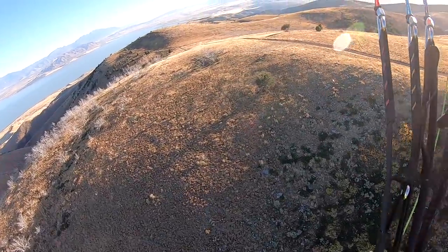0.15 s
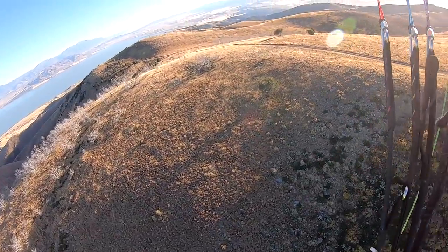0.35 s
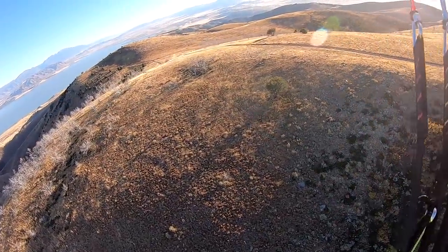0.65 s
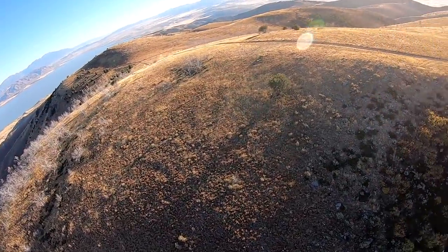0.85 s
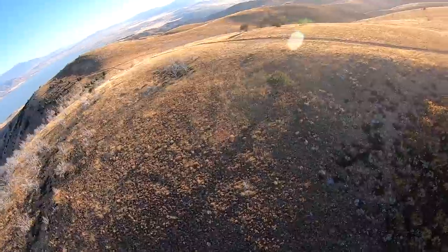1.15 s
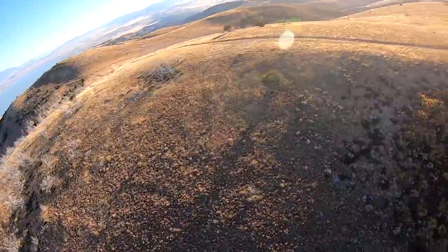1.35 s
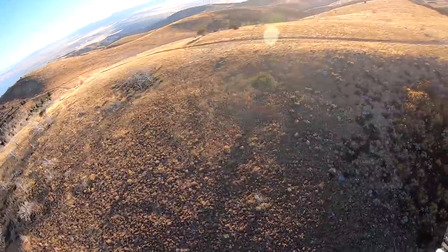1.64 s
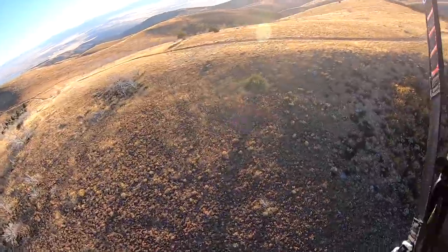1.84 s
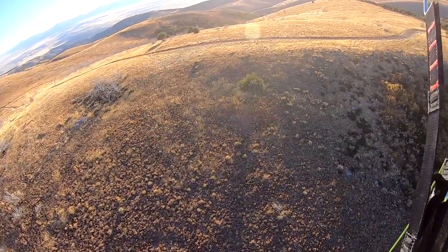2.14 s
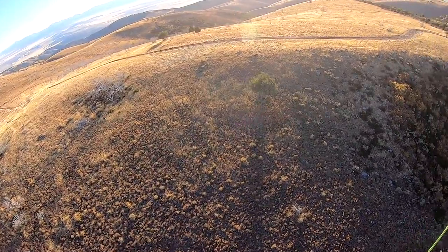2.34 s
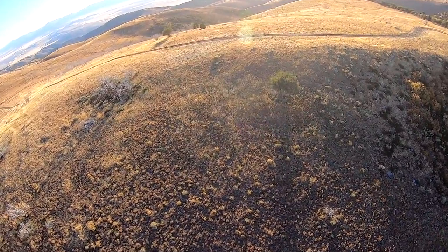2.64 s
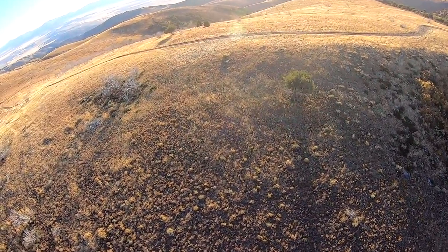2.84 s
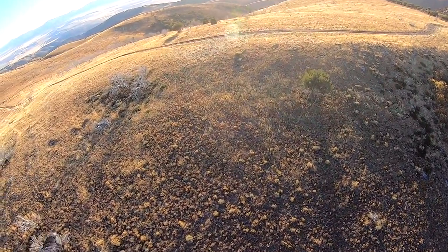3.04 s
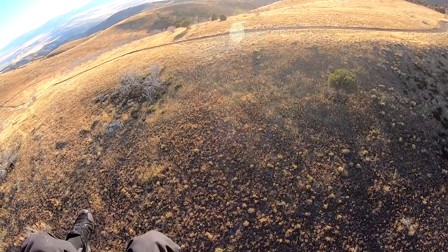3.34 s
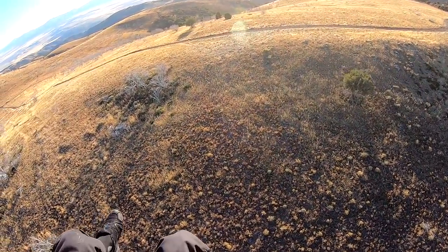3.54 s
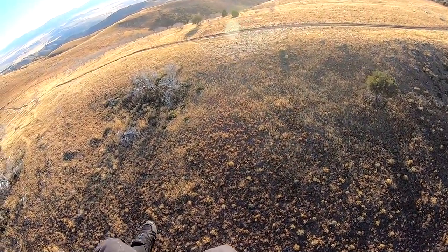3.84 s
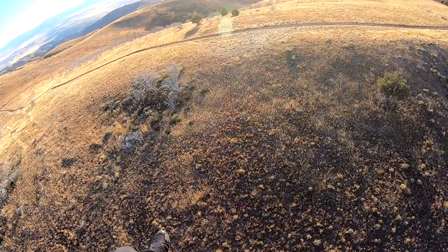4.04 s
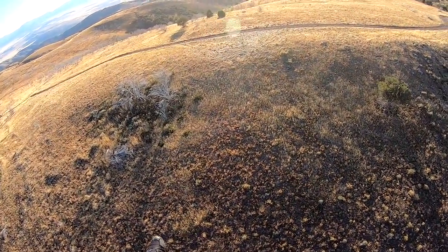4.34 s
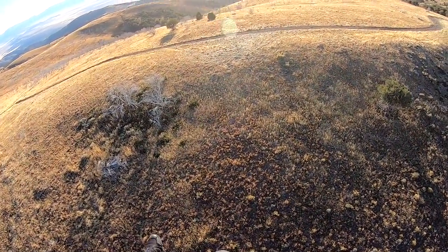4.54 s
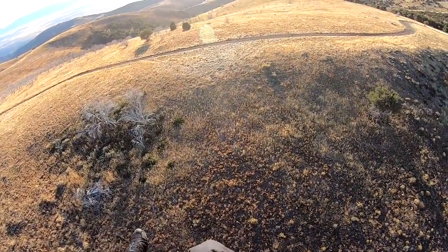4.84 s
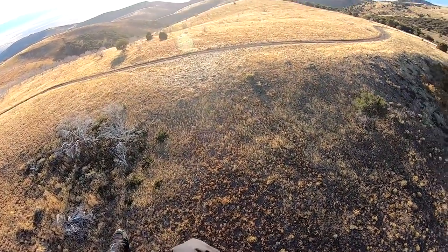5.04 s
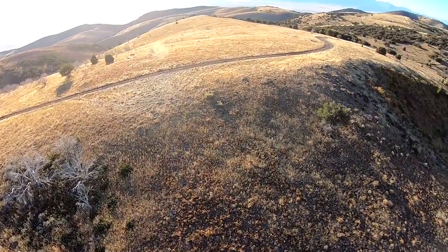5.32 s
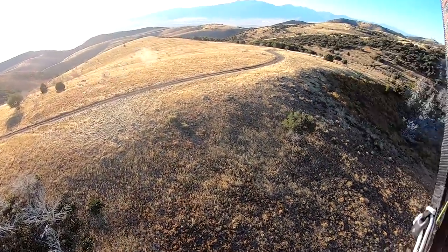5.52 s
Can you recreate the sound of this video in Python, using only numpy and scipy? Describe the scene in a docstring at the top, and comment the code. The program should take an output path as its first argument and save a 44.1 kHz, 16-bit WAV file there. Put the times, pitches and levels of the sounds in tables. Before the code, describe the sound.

In flight, a small motor's throttle closes; chopping blades and their high whistle sink away, leaving uneven engine pops and buffeting wind.

```python
"""Paramotor winding down to idle

Heard from the pilot's helmet in flight: the throttle closes and the propeller slows to idle.
Each blade pass gives a pressure thump (a sum of cosines), a swish (pulsing noise) and a falling whistle
(noise through a moving resonance). The two-stroke engine rattles, knocks and pops unevenly: noise puffs,
ringing metal and dying sines. Slowly swelling noise is the airstream buffeting the microphone."""
import sys
import numpy as np
from scipy import signal
from scipy.fft import rfft, irfft
from scipy.io import wavfile

SR = 44100
rng = np.random.default_rng(int(sys.argv[2]) if len(sys.argv) > 2 else 0)


def unload_wav(signal):
    """Save mono or channel-first audio to the path in sys.argv[1] as 16-bit WAV at rate SR, clipped to [-1, 1]."""
    wavfile.write(
        sys.argv[1],
        SR,
        np.round(np.clip(np.atleast_2d(signal).T, -1, 1) * 32767).astype(np.int16),
    )


N = 250488
TIME = np.arange(N) / SR


def gain_of(db):
    """Turns decibels into amplitude: 20 dB more is ten times the swing."""
    return 10 ** (np.asarray(db) / 20)


def evened(x):
    """Scales a signal to an average strength (rms) of 1."""
    return x / np.sqrt(np.mean(x ** 2) + 1e-20)


def follow(table, at=TIME):
    """Reads every other column of a table at the given values of its first one."""
    key, *columns = np.transpose(table)
    return [np.interp(at, key, column) for column in columns]


def noise(colour):
    """Noise of rms 1 whose strength at each frequency follows a colour table."""
    hz, db = np.transpose(colour)
    frequencies = np.fft.rfftfreq(N, 1 / SR)
    shape = gain_of(np.interp(np.log(frequencies + 1), np.log(hz), db))
    shape[0] = 0  # no constant offset
    return evened(irfft(rfft(rng.standard_normal(N)) * shape, N))


def drift(hz):
    """A random wander of rms 1 whose changes fade out around the given rate."""
    shape = np.exp(-(np.fft.rfftfreq(N, 1 / SR) / hz) ** 2)
    return evened(irfft(rfft(rng.standard_normal(N)) * shape, N))


def resonate(x, hz, width):
    """A resonance that can follow a moving pitch: shift the pitch to zero, smooth, shift back."""
    turn = np.exp(2j * np.pi * np.cumsum(hz * np.ones(N)) / SR)
    r = np.exp(-np.pi * width / SR)
    return 2 * (turn * signal.lfilter([1 - r], [1, -r], x / turn)).real


def resonate_twice(x, hz, width):
    """Two equal resonances in a row, brought to rms 1, single out the pitch more sharply."""
    return evened(resonate(resonate(x, hz, width), hz, width))


def burst(u, rise, fall):
    """An envelope that swells up to u = 0 and then dies away."""
    return np.exp(-(np.minimum(u, 0) / rise) ** 2 - np.maximum(u, 0) / fall)


# the blades push at cruise and carry no load near the freewheeling rate [blade passes per second]
CRUISE_RATE, FREEWHEEL_RATE = 40, 11


def load_db(speed):
    """Load on the blades against cruise; it collapses as the propeller nears freewheeling."""
    return 20 * np.log10((speed - FREEWHEEL_RATE) / (CRUISE_RATE - FREEWHEEL_RATE))


def loudness(law, speed):
    """Level in dB of a sound that grows with the blade load."""
    cruise_db, slope = law
    return cruise_db + slope * load_db(speed)


# tones in one blade's pressure pulse: multiple of the blade rate, relative level/dB
THUMP_TONES = [(1, 0), (2, -10), (3, -10), (4, -11), (5, -18), (6, -22), (7, -21)]


def thump(passes, level_db, overtone_db, lag=0.1584, uneven=0.21, cusp=0.074):
    """Each passing blade gives a pressure pulse with a pointed top; the two blades differ a little."""
    angle = 2 * np.pi * (passes - lag)
    tones = [gain_of(db) * np.cos((k + 1) * angle) for k, (_, db) in enumerate(THUMP_TONES)]
    fundamental, *overtones = tones
    u = (passes - lag + .5) % 1 - .5  # share of a pass before or after the pressure peak
    peak = np.exp(-abs(u) / .03)
    # the point flattens out as the thump weakens
    sharpness = cusp * gain_of(1.7 * drift(8.8) + level_db - level_db.max())
    # this cosine flips sign from one blade to the next
    blade_difference = uneven * np.cos(3 * angle / 2)
    pulse = fundamental + gain_of(overtone_db) * sum(overtones) + blade_difference + sharpness * peak
    return gain_of(level_db + 1.0 * drift(7.5)) * evened(pulse - pulse.mean())


# colour of the air torn by the blades: f/Hz, level/dB (per Hz)
SWISH_NOISE = [(150, -1.5), (350, 3.5), (680, 0), (1130, -6), (1400, -8.5), (1620, -8.5), (1950, -12),
               (2800, -16), (4300, -22.5), (6000, -26), (9000, -26), (14000, -35), (16000, -41)]


def swish(passes, level_db, lag=0.019, spread=0.22, between=0.87, slap=0.44, grit_db=1.67, bite_db=1.5):
    """Turbulence off the blades: noise swells as one sweeps by, with a slap just after mid-sweep."""
    u = (passes - lag + .5) % 1 - .5  # share of a pass before or after mid-sweep
    sweep = np.exp(-(u / spread) ** 2) + slap * burst(u - .11, rise=0.03, fall=0.14)
    uneven_sweep = sweep * gain_of(bite_db * drift(46))
    envelope = (between + uneven_sweep) * gain_of(grit_db * drift(740))
    return gain_of(level_db) * evened(envelope * noise(SWISH_NOISE))


# the whistle climbs and grows with tip speed: blade passes per second, middle f/Hz, base level/dB
WHISTLE_BY_SPEED = [(16, 4200, -74), (19.4, 4500, -58.5), (23.7, 7240, -46), (32.3, 10700, -31.5),
                    (37, 12300, -30.5), (39.5, 12550, -27), (43.2, 13360, -25)]
# swing to either side within a pass, and flutter (rms), as shares of the middle pitch
DOPPLER, FLUTTER = 0.07, 0.011


def whistle(passes, speed, mismatch=0.03, mismatch_db=1.5, width_hz=1200,
            scatter=0.0034, scatter_db=1.5, skirt_db=-11):
    """Vortices whistle at the blade tips; the pitch falls as each tip comes near and turns away."""
    hz, db = follow(WHISTLE_BY_SPEED, speed)
    blade = np.floor(passes + .45).astype(int)
    u = passes - blade
    side = 1 - 2 * (blade % 2)  # +1 for one blade, -1 for the other
    # every pass is a little off in pitch and strength
    sharp, strong = rng.standard_normal((200, 2))[blade].T
    swing = DOPPLER * np.sin(np.pi * u)
    pitch = hz * (1 - swing + mismatch * side + scatter * sharp + FLUTTER * drift(250))
    tone = resonate_twice(rng.standard_normal(N), pitch, width_hz)
    # an airy skirt surrounds the tone and takes over once the tips run slowly
    skirt = resonate_twice(rng.standard_normal(N), hz, 3400)
    clear = np.interp(hz, [6800, 9000], [.3, 1])
    voice = clear * tone + (gain_of(skirt_db) + 1 - clear) * skirt
    # one main beam and a weaker trailing lobe sweep past the listener
    beam = np.exp(-((u + 0.087) / 0.13) ** 2) + 0.38 * np.exp(-((u - .24) / 0.08) ** 2)
    pass_gain = gain_of(scatter_db * strong - mismatch_db * side)
    return gain_of(db) * voice * evened(beam * pass_gain + 0.093)


# engine noise by speed: blade passes per second, rattle level/dB, hiss level/dB, ringing level/dB
ENGINE_BY_SPEED = [(16, -43, -55.5, -60), (18.2, -43, -55.5, -58), (22.6, -37.5, -47, -51),
                   (43.2, -51, -39.5, -40.5)]
# metal parts shaken by the engine: f/Hz, width/Hz of each resonance, relative level/dB
METAL_RINGS = [(1597, 100, -3.5), (1135, 110, 0), (2830, 280, -13), (7370, 420, -10.5), (11050, 540, -9.5)]
# colours of the engine noise: f/Hz, level/dB (per Hz)
RATTLE_NOISE = [(250, -1), (480, -4.5), (650, -8), (1100, -13.5), (1400, -15.5), (1800, -17), (2700, -18),
                (3300, -22.5), (5700, -30), (9000, -39), (16000, -61)]
HISS_NOISE = [(2500, -36), (4200, -1.5), (6000, 0), (8000, 3.5), (11000, 3), (13000, 1), (14500, -3),
              (16000, -22)]
# extra rattle and hiss after a hard firing [dB against its own hiss], fall to about a third [s]
SHAKE_DB, AFTER_HISS_DB, SHAKE_S = -8.0, -20, 0.085


def engine(passes, speed, firings_per_pass=1.9, between=2.5):
    """Strokes shake puffs of noise from the engine and ring its metal; hard firings add to the noise."""
    shake = sum(gain_of(db) * burst(TIME - s, rise=0.0063, fall=SHAKE_S) for s, db, _ in HARD_FIRINGS)
    rattle_db, hiss_db, ring_db = follow(ENGINE_BY_SPEED, speed)
    hiss = gain_of(hiss_db) + gain_of(AFTER_HISS_DB) * shake
    rattle = gain_of(rattle_db) + gain_of(SHAKE_DB) * shake
    strokes = passes * firings_per_pass + 1
    # each stroke has its own chance strength in dB
    strength = gain_of(rng.uniform(-6.2, 8.4, 1000))[strokes.astype(int)]
    beat = strength * burst(strokes % 1 - .15, rise=0.13, fall=0.24)
    running = rattle * noise(RATTLE_NOISE) + hiss * noise(HISS_NOISE)
    blows = (0.068 + beat) * rng.standard_normal(N)
    rings = sum(gain_of(db) * resonate_twice(blows, hz, width) for hz, width, db in METAL_RINGS)
    return running * evened(between + beat) + gain_of(ring_db) * rings


# gusts: t/s of the middle, half length/s, strength as added level/dB
GUST_LIST = [(0.01, 0.13, 13), (0.617, 0.27, 6.5), (1.07, 0.23, 10.5), (1.515, 0.31, 10), (3.329, 0.18, 9),
             (3.57, 0.038, 6.5), (3.825, 0.11, 7), (4.263, 0.21, 4), (4.622, 0.095, 1), (5.07, 0.15, 8.5),
             (5.377, 0.16, 7)]
# colours of the wind: f/Hz, level/dB (per Hz)
RUMBLE_NOISE = [(3, -13), (9, 9), (20, 6.5), (35, 5.5), (60, -1), (100, -1.5), (130, -6), (170, -8),
                (300, -38), (1000, -91)]
BUFFET_NOISE = [(60, -76), (130, 1.5), (195, -0.5), (270, -5), (420, -10.5), (600, -22), (1000, -31),
                (2000, -50.5), (5000, -55)]
# airstream level between gusts [dB], and the share of a gust's dB that reaches the deep rumble
RUMBLE_DB, BUFFET_DB, RUMBLE_SHARE = -24.5, -34, 0.67


def wind(lumps_db=1.5):
    """Eddies on the microphone: a deep rumble under lumpy buffeting, both swelling in each gust."""
    gust_db = sum(db * np.exp(-((TIME - s) / length) ** 2) for s, length, db in GUST_LIST)
    rumble = gain_of(RUMBLE_DB + RUMBLE_SHARE * gust_db) * noise(RUMBLE_NOISE)
    lumpy = evened(noise(BUFFET_NOISE) * gain_of(lumps_db * drift(66)))
    return rumble + gain_of(BUFFET_DB + gust_db) * lumpy


# loose metal knocks and ticks as the engine runs down: t/s, f/Hz, level/dB
METAL_KNOCKS = [(1.495, 1620, -33), (1.608, 1630, -35), (1.68, 1630, -36), (1.721, 1610, -34),
                (1.83, 1640, -34.5), (1.906, 1620, -35), (1.982, 1650, -37), (2.188, 1640, -38),
                (2.317, 1630, -41), (2.403, 1640, -41), (2.59, 7450, -56), (2.62, 7450, -56),
                (2.713, 7450, -56), (2.925, 2790, -47), (3.09, 7450, -53), (3.148, 7450, -56),
                (3.203, 7450, -50)]


def knocks(waver_hz=70, ring_s=0.0078, clatter_db=-2):
    """Loose metal knocks as the engine slows: a short, wavering ring over a dull clatter."""
    waver = drift(waver_hz)
    clatter = gain_of(clatter_db) * noise(RATTLE_NOISE)
    out = np.zeros(N)
    for s, hz, db in METAL_KNOCKS:
        part = slice(round(s * SR) - SR // 100, round(s * SR) + SR // 10)
        t = TIME[part] - s
        ring = np.sqrt(2) * np.sin(2 * np.pi * hz * t + 1.0 * waver[part])
        out[part] += gain_of(db) * burst(t, rise=0.0018, fall=ring_s) * (ring + clatter[part])
    return out


# strong single firings: t/s, hiss level/dB, thud level/dB
HARD_FIRINGS = [(2.1135, -59, -35), (2.188, -57, -22), (2.4592, -57, -35), (2.7195, -63, -24),
                (3.3241, -55, -18), (3.796, -53, -26), (3.9724, -50, -21.5), (4.083, -56, -23),
                (4.191, -51, -18), (4.432, -56, -27), (4.6265, -47, -17), (4.732, -50, -26.5),
                (4.8137, -46, -17), (4.9397, -48, -23), (5.0198, -37, -15), (5.1466, -39, -17.5),
                (5.246, -41, -30), (5.3296, -38.5, -19), (5.4542, -41.5, -16.5), (5.5814, -43, -17.5)]
# the exhaust thud rings with: f/Hz before detuning, relative level/dB, time to fall by 60 dB/s
THUD_TONES = [(415, 1.5, 0.013), (220, -20, 0.023), (700, -8, 0.007), (1030, -32, 0.024),
              (1530, -29, 0.063), (2570, -23.5, 0.02)]
# colours of the puff of hiss and of the rush of gas after each thud: f/Hz, level/dB (per Hz)
PUFF_NOISE = [(1500, 8), (3500, -6.5), (6000, -4), (8500, 0.5), (11000, 1), (14000, 4), (16000, -16)]
GAS_NOISE = [(100, 0), (300, 13), (650, 11), (1150, -24), (2200, -5), (3500, -41), (8000, -45)]


def pops(gas_db=-18, clank_db=-6.5, clank_hz=2950, lead=0.0077):
    """The two-stroke fires hard at uneven times: a clank, then an exhaust thud in a puff of hiss."""
    puff, clank, gas, thud = np.zeros((4, N))
    for s, high_db, low_db in HARD_FIRINGS:
        part = slice(round(s * SR) - SR // 40, round(s * SR) + SR // 10)
        t = TIME[part] - s
        detune = 1 + 0.079 * rng.standard_normal()
        puff[part] += gain_of(high_db) * burst(t - .002, rise=0.01, fall=0.006)
        # the clank comes first, by the lead in seconds
        clank[part] += gain_of(high_db + clank_db) * burst(t + lead, rise=.001, fall=0.007)
        gas[part] += gain_of(low_db + gas_db) * burst(t, rise=0.00046, fall=0.02)
        age = np.maximum(t, 0)
        for hz, db, t60 in THUD_TONES:
            dying = gain_of(low_db + db - 60 * age / t60)
            thud[part] += dying * np.sin(2 * np.pi * hz * detune * age)
    metal = resonate_twice(rng.standard_normal(N), clank_hz, 450)
    return puff * noise(PUFF_NOISE) + clank * metal + gas * noise(GAS_NOISE) + thud


def frame_echoes(x, echo_db=-10, count=12):
    """Cage, tank and harness throw back faint early echoes that comb the sound."""
    taps = np.zeros(SR // 50)
    places = rng.integers(SR // 700, len(taps), count)
    taps[places] = rng.choice([-1, 1], count) * gain_of(echo_db) / np.sqrt(count)
    taps[0] = 1  # the direct sound
    return signal.oaconvolve(x, taps / np.linalg.norm(taps))[:N]


# propeller speed: t/s, blade passes per second
PROPELLER_SPEED = [(0.0, 43.05), (0.2, 42.08), (0.45, 39.68), (0.65, 39.6), (0.9, 40.18), (1.05, 37.37),
                   (1.25, 33.08), (1.5, 28.22), (1.75, 25.06), (2.0, 22.24), (2.3, 19.64), (2.7, 17.52),
                   (3.3, 16.0), (5.68, 16.0)]
# loudness against blade load: level/dB at cruise, dB per dB of load (overtones: relative level)
THUMP_LOUDNESS = (-18.5, 0.57)
OVERTONE_LOUDNESS = (-0.4, 0.6)
SWISH_LOUDNESS = (-22.5, 1.816)
# the thump dips around one speed: blade passes per second, half width of that rate, level/dB
THUMP_SPEED_DIP = (24.8, 2.8, -7.5)


def scene():
    """One shaft drives propeller and engine; its speed sets their rhythm and guides their loudness."""
    speed, = follow(PROPELLER_SPEED)
    passes = np.cumsum(speed) / SR - .1  # running count of blade passes
    dip_rate, dip_width, dip_db = THUMP_SPEED_DIP
    dip = dip_db * np.exp(-((speed - dip_rate) / dip_width) ** 2)
    thump_db = loudness(THUMP_LOUDNESS, speed) + dip
    propeller = thump(passes, thump_db, loudness(OVERTONE_LOUDNESS, speed))
    propeller += swish(passes, loudness(SWISH_LOUDNESS, speed))
    propeller += whistle(passes, speed)
    machine = frame_echoes(engine(passes, speed) + knocks() + pops())
    return (propeller + machine + wind())[None]


EDGE_HZ = 15850  # upper edge of the sound


def record(dry):
    """A steep low-pass filter takes away the treble above the upper edge."""
    low_pass = signal.firwin(511, EDGE_HZ, window=("kaiser", 9), fs=SR)
    return signal.oaconvolve(dry, low_pass[None], "same")


dry = scene()
out = record(dry)
unload_wav(out)
```